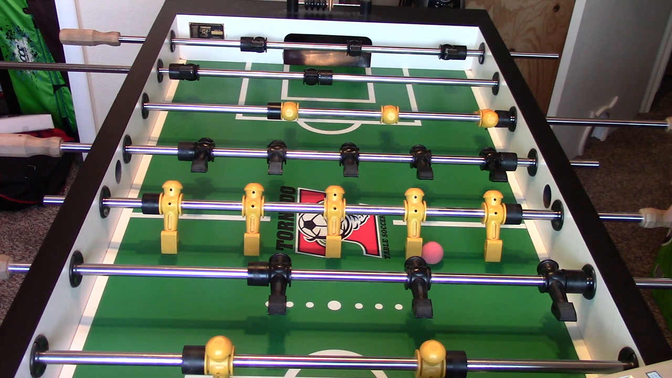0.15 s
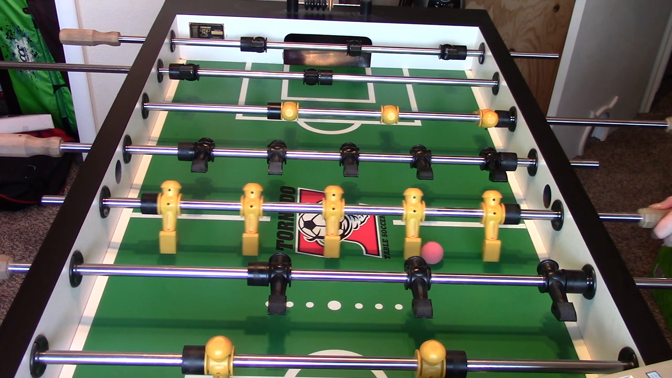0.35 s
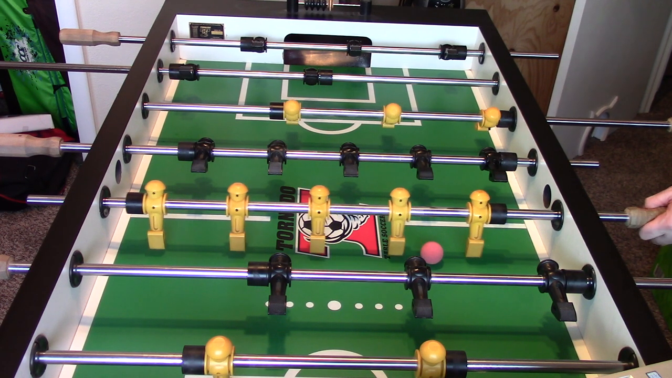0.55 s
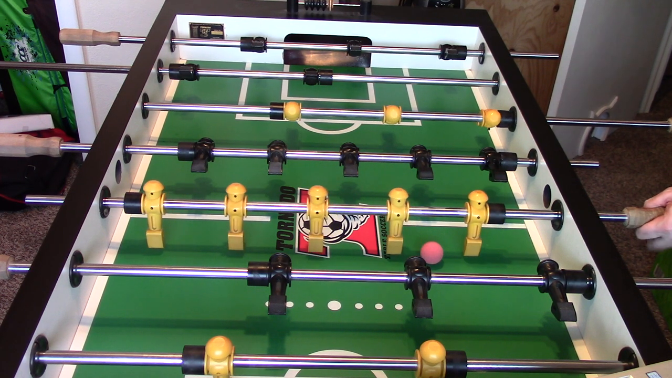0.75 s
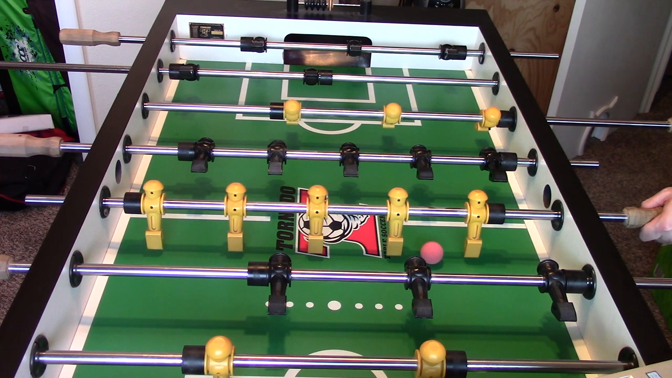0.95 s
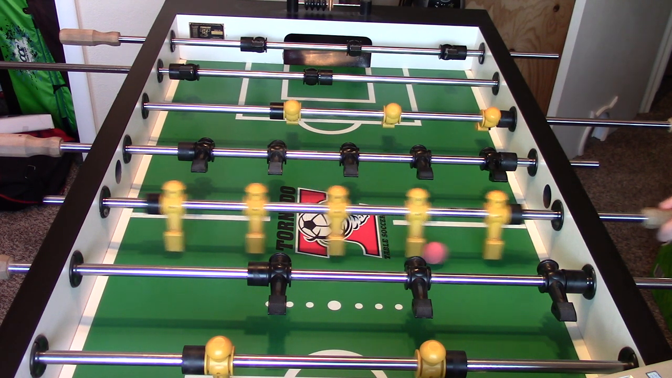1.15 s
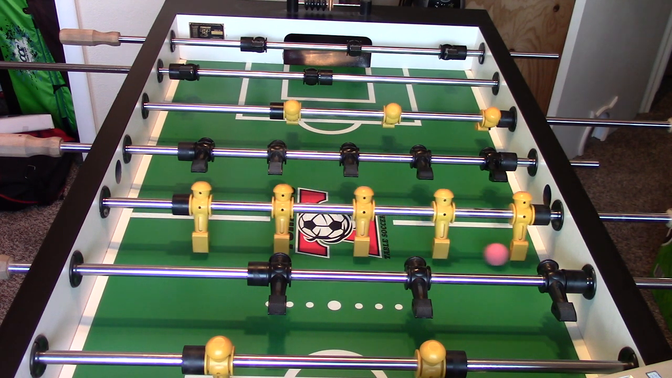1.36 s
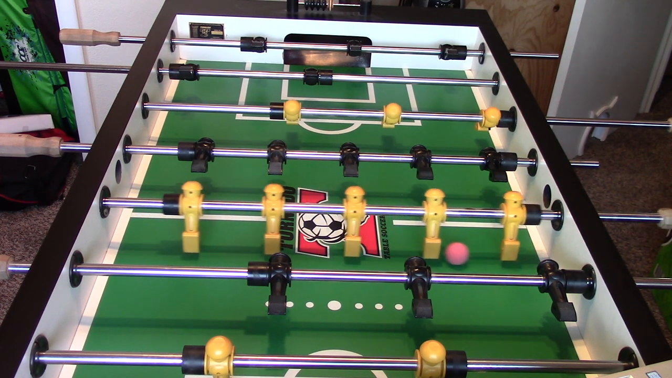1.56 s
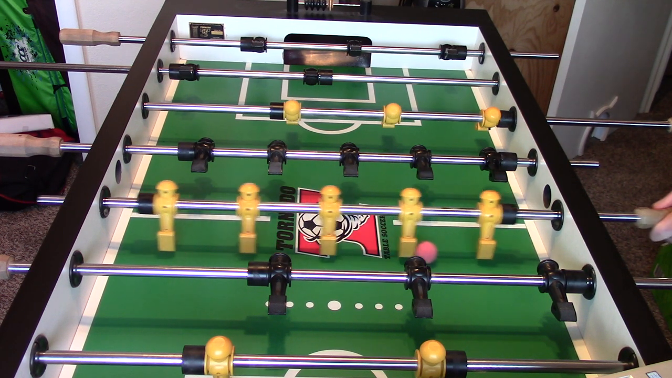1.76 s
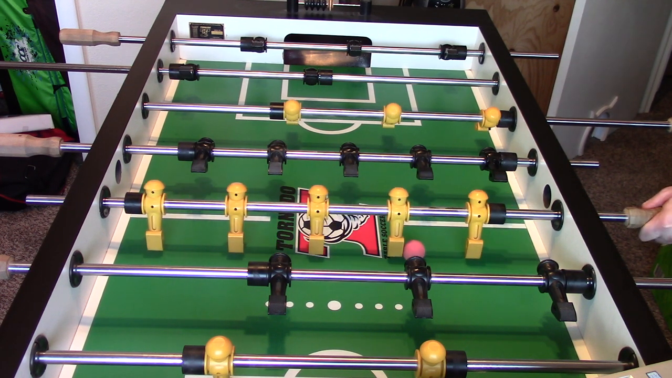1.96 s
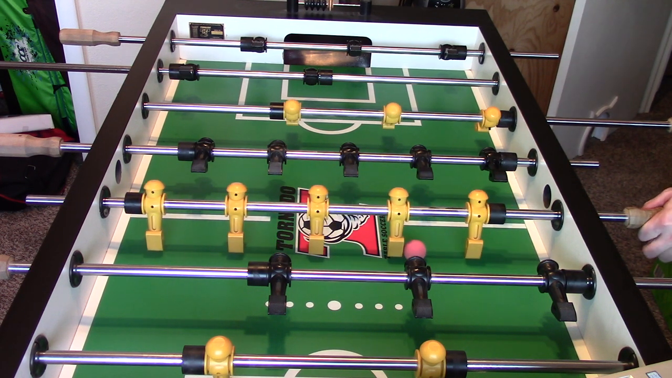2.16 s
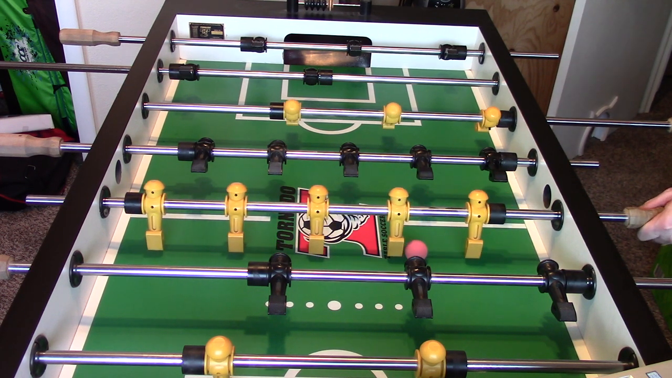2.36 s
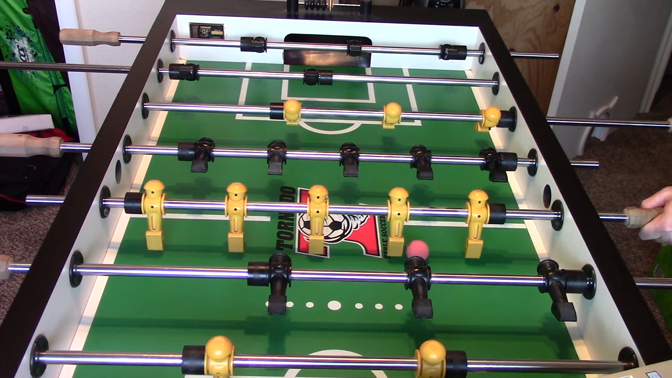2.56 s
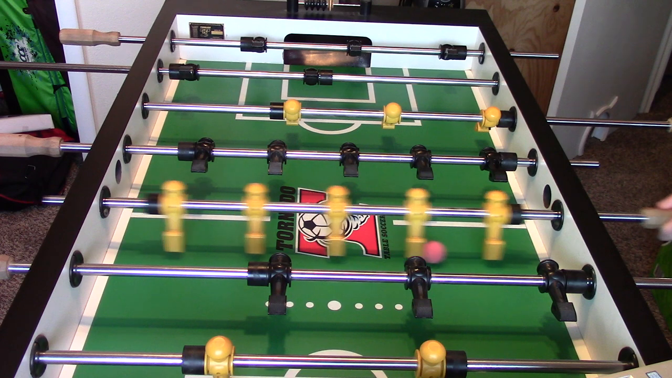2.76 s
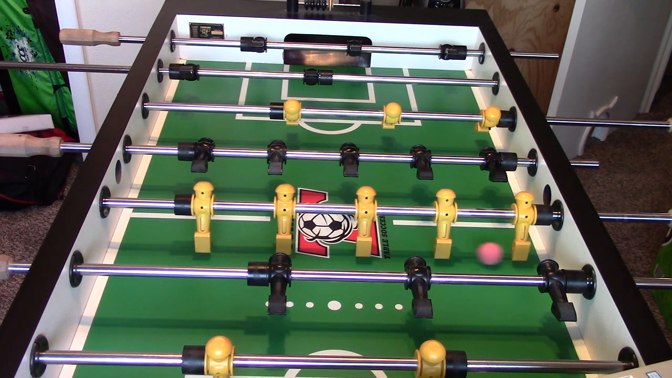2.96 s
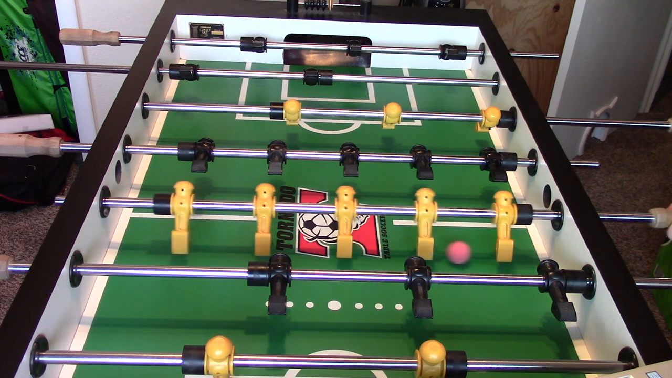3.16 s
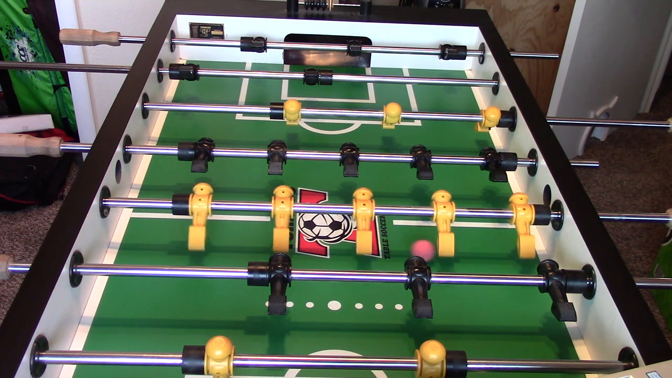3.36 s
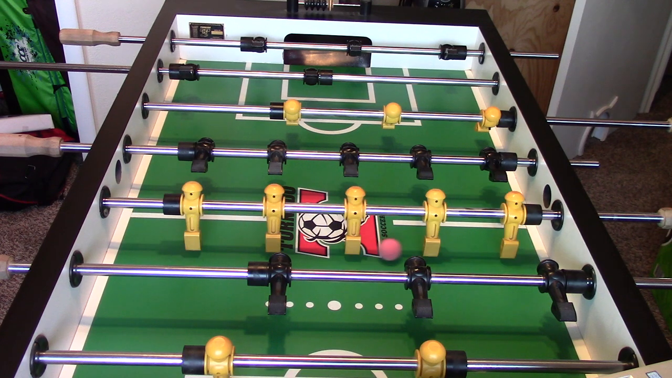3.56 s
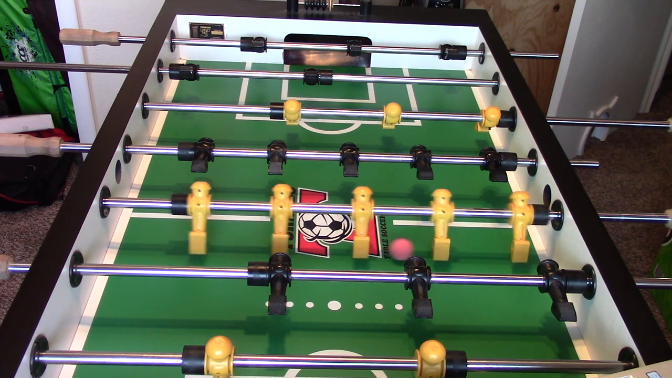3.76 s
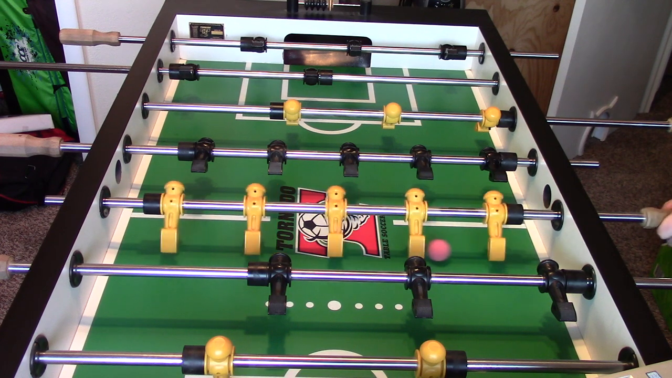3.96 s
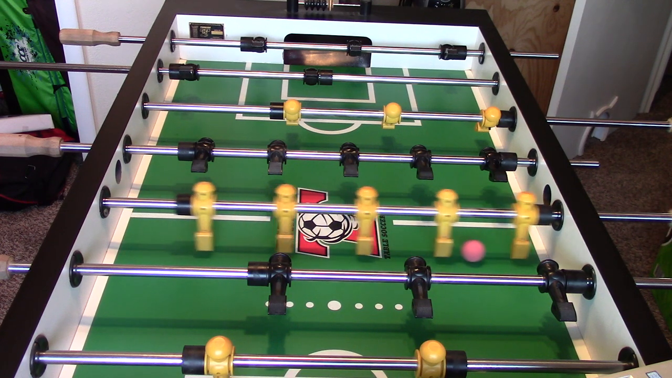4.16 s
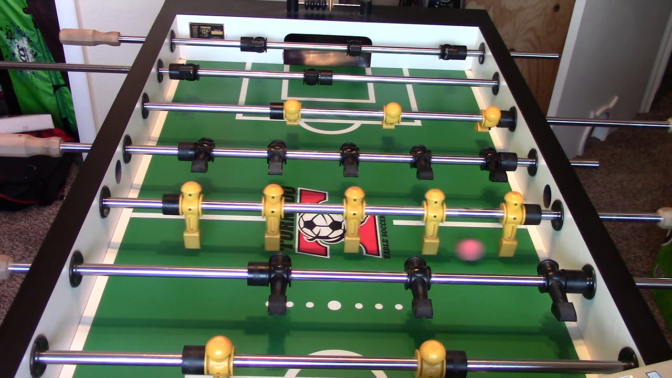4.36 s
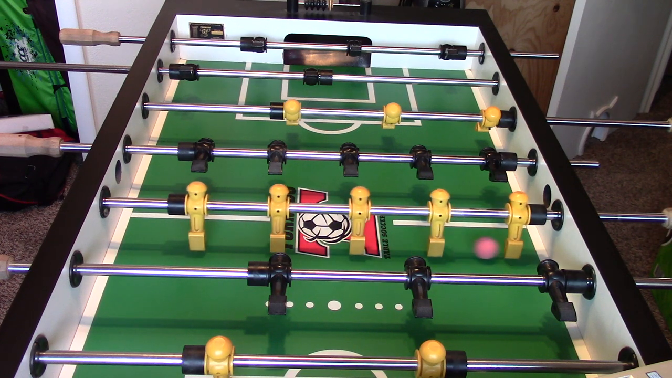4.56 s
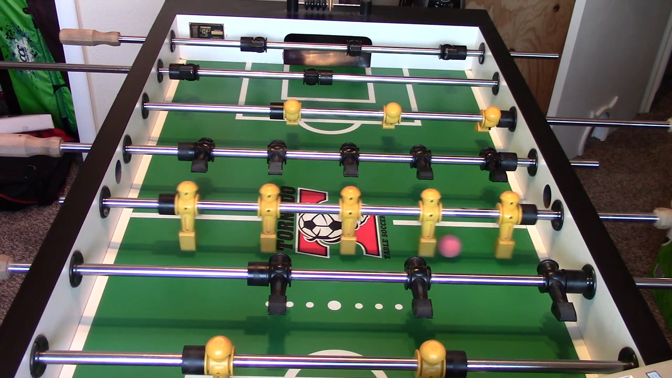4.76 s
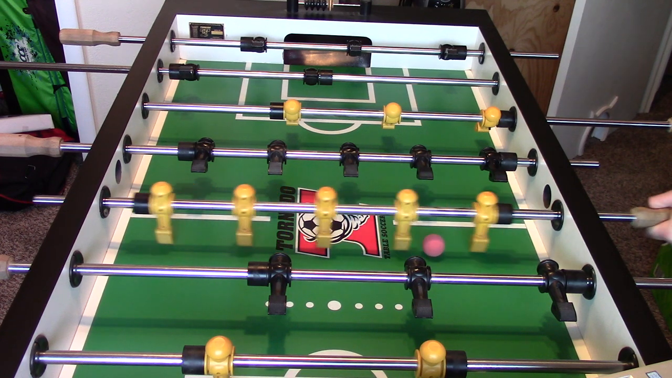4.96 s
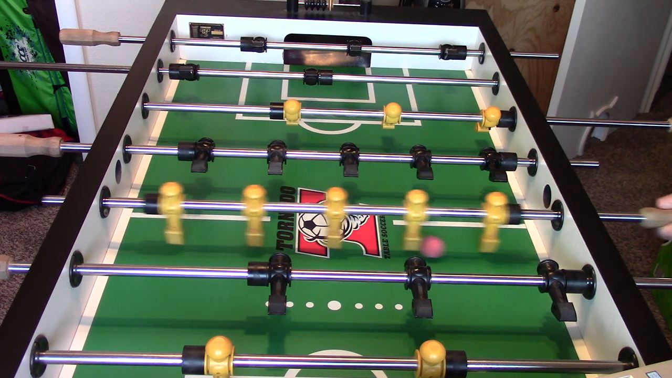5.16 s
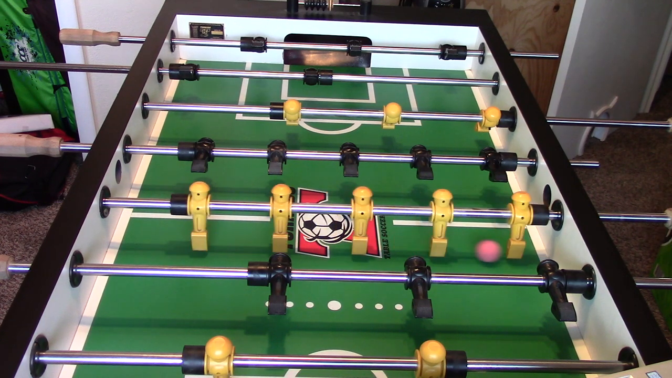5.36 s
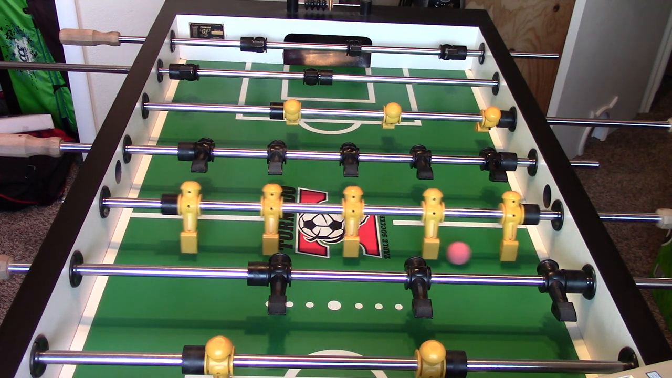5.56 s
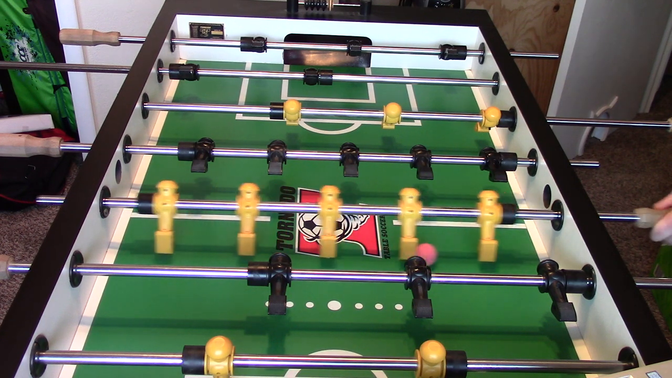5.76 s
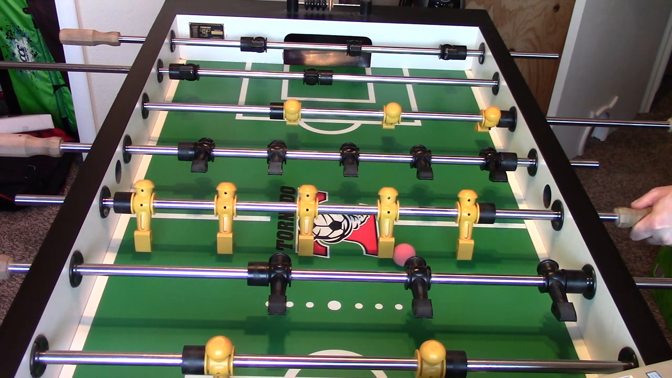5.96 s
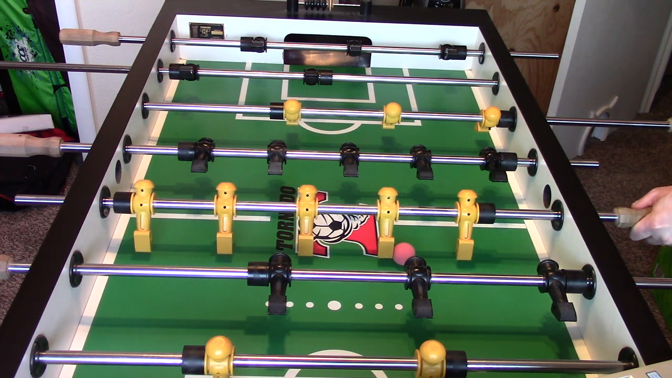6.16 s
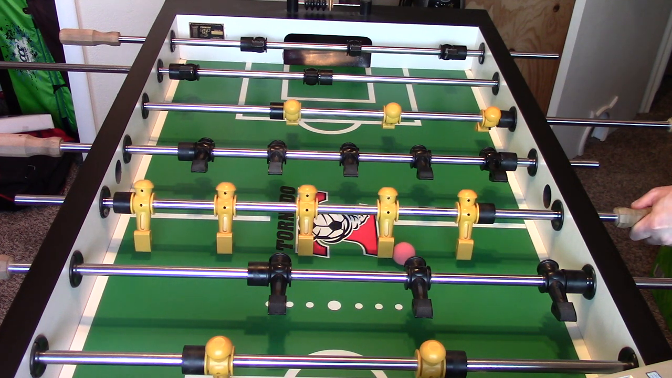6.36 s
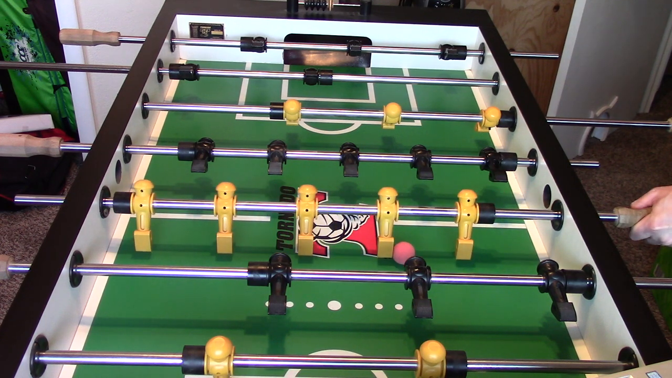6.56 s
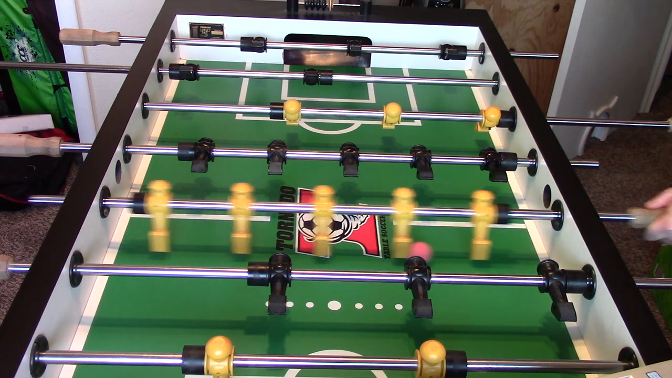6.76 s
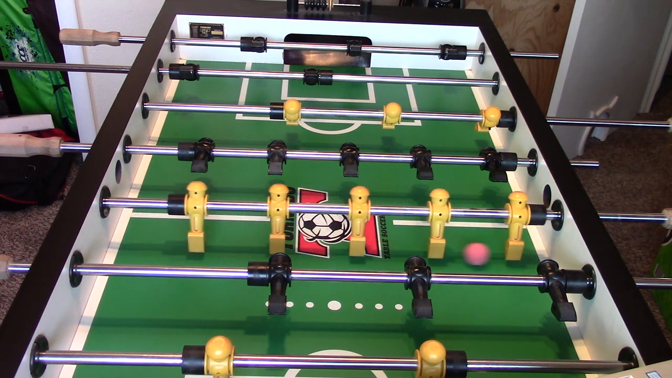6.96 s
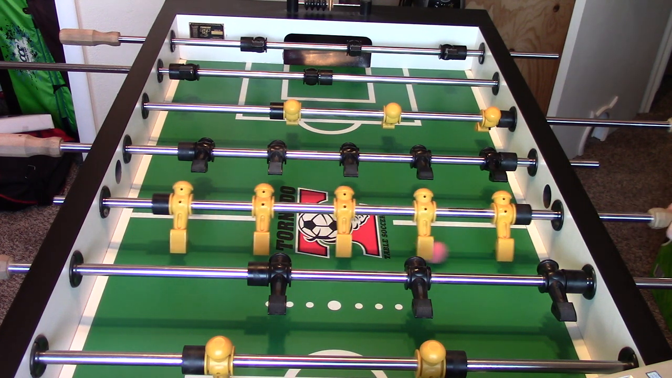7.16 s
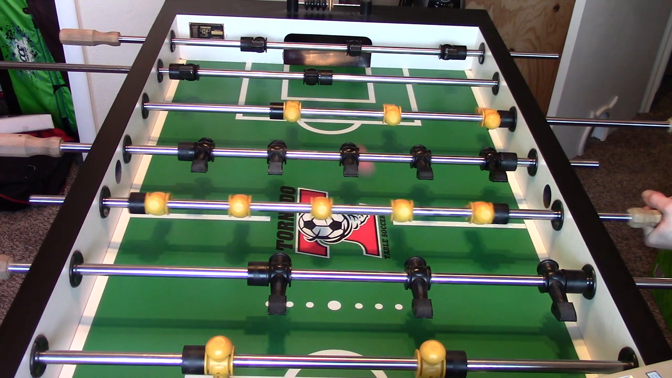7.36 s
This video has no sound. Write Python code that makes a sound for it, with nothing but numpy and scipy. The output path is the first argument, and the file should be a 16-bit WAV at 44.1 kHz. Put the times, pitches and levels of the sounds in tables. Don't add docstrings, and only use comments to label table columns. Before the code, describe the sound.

A hard ball clacks back and forth between plastic table figures, steel rod hissing and knocking a hollow wooden cabinet, then one loud shot.

```python
import sys
import numpy as np
from scipy import signal
from scipy.fft import rfft, irfft, next_fast_len
from scipy.io import wavfile
from scipy.ndimage import uniform_filter1d

SR = 44100
rng = np.random.default_rng(int(sys.argv[2]) if len(sys.argv) > 2 else 0)


def gain_from_decibels(decibels):
    exponent = np.asarray(decibels, float) / 20
    return 10 ** exponent


def dump_mix(stems):
    frames = np.atleast_2d(stems).T
    limited = np.clip(frames, -1, 1)
    pcm = np.round(limited * 32767).astype(np.int16)
    wavfile.write(sys.argv[1], SR, pcm)


N = 326207


def noise():
    return rng.standard_normal(N)


def band(x, hz, width, order=1):
    edges = np.clip([hz - width / 2, hz + width / 2], 20, 0.48 * SR)
    return signal.sosfilt(signal.butter(order, edges, "band", fs=SR, output="sos"), x)


def low_cut(x, hz, order):
    return signal.sosfilt(signal.butter(order, hz, "high", fs=SR, output="sos"), x)


def unit(x):
    return x / np.sqrt(np.mean(x ** 2))


def colour(x, table):
    hz, db = np.transpose(table)
    size = next_fast_len(len(x))
    log_hz = np.log(np.fft.rfftfreq(size, 1 / SR) + 1)
    gain = gain_from_decibels(np.interp(log_hz, np.log(hz), db))
    return irfft(rfft(x, size) * gain, size)[:len(x)]


def echo(x, t60, gap):
    t = np.arange(SR // 2) / SR
    tail = rng.standard_normal(len(t)) * gain_from_decibels(-60 * t / t60) * (t > gap)
    return signal.fftconvolve(x, tail / np.sqrt(np.sum(tail ** 2)))[:N]


def strike(times, gains, scales, hz, t60, detune, rise, rattle):
    out = np.zeros(N + SR)
    t = np.arange(SR // 4, dtype=np.float32) / SR
    push = 1 - np.exp(-t / max(rise, 1e-5))
    shifts = 1 + detune * rng.standard_normal(gains.shape)
    shake = unit(band(rng.standard_normal(3 * SR), 50, 60, order=2))
    flutter = 1 + rattle * shake.astype(np.float32)
    flutter = np.lib.stride_tricks.sliding_window_view(flutter, len(t))
    picks = rng.integers(0, len(flutter), gains.shape)
    for s, gain, scale, shift, pick in zip(times, gains, scales, shifts, picks):
        turn = np.float32(2 * np.pi * hz * shift)
        loss = np.float32(np.log(1000) / (t60 * max(scale, 0.2)))
        rings = np.sin(np.outer(turn, t)) * np.exp(-np.outer(loss, t)) * flutter[pick]
        start = int(s * SR)
        out[start:start + len(t)] += push * (np.float32(gain) @ rings)
    return out[:N]


# f/Hz, level/dB per Hz
ROOM_NOISE = [(25, -16), (70, -19), (110, -7), (160, -8.5), (260, -10), (400, -9.5), (700, -13.5),
              (1500, -18), (2500, -21), (6000, -27.5), (8000, -30), (11000, -35), (13500, -38),
              (16000, -47)]
# f/Hz, width/Hz, level/dB
HUM = [(124.4, 6.7, -62), (1333, 56, -71.5), (1581, 44, -72)]


def air(hum_db):
    hum = sum(gain_from_decibels(db) * unit(band(noise(), hz, width)) for hz, width, db in HUM)
    return unit(colour(noise(), ROOM_NOISE)) * gain_from_decibels(-59) + gain_from_decibels(hum_db) * hum


# t/s, length/s, hiss level/dB at top speed, squeal level/dB above the hiss
STROKES = [(0.17, 0.55, -68.5, 7.5), (0.687, 0.079, -67, 2), (0.85, 0.74, -77.5, 12), (1.145, 0.17, -64, 6),
           (1.49, 0.46, -70, 10), (1.997, .075, -67, -11), (2.635, 0.22, -75, 9), (2.722, .2, -63.5, 5.5),
           (3.03, 0.4, -67.5, 5), (3.397, 0.18, -71.5, 10.5), (3.588, .13, -71.5, 14.5),
           (3.736, .26, -67.5, 6), (3.973, 0.29, -69, 9.5), (4.23, 0.13, -69.5, 6),
           (4.657, 0.16, -69, 10.5), (4.8, 0.27, -68.5, 9), (5.06, 0.13, -70, 11.5),
           (5.164, 0.19, -67.5, 10), (5.496, 0.51, -68.5, 9.5), (6.135, 0.039, -72, -9),
           (6.658, 0.32, -65.5, 7), (6.965, 0.14, -72, 13), (7.24, .3, -56, 7), (7.391, 0.033, -46.5, -3)]


def strokes():
    speed_power = 0.57
    t = np.arange(N) / SR
    power = np.zeros((2, N))
    for start, length, hiss_db, squeal_db in STROKES:
        speed = np.sin(np.pi * np.clip((t - start) / length, 0, 1)).clip(0)
        top_gain = gain_from_decibels(np.array([hiss_db, hiss_db + squeal_db]) - 4)
        power += np.outer(top_gain, speed ** speed_power) ** 2
    return np.sqrt(power)


# f/Hz, width/Hz, level/dB
BEARING = [(1420, 2300, 9.5), (4200, 2400, -0.5), (7030, 3050, 2), (9150, 4800, -2), (13500, 3000, -13)]


def rod_friction():
    hiss_gain, squeal_gain = strokes()
    hiss = sum(gain_from_decibels(db) * unit(band(noise(), hz, width, order=2)) for hz, width, db in BEARING)
    squeal = unit(band(noise(), 2765, 690, order=2))
    return hiss * hiss_gain + squeal * squeal_gain


# t/s, peak level/dB
BUMPS = [(0.291, -36.5), (0.419, -50), (0.498, -38.5), (0.513, -45), (0.629, -44), (0.772, -32),
         (0.794, -37), (1.602, -39.5), (1.759, -41), (3.329, -42), (3.424, -44), (3.47, -40.5),
         (3.684, -21), (3.852, -28.5), (3.921, -42), (4.249, -38), (4.689, -35), (5.361, -31.5),
         (5.629, -53), (5.696, -38), (6.66, -42), (6.808, -28)]
# t/s, peak level/dB, centre f/Hz
RATTLES = [(0.347, -29.5, 417), (1.247, -27, 525), (1.322, -28, 530), (1.431, -24.5, 500),
           (2.734, -31.5, 467), (2.898, -27.5, 550), (2.96, -23.5, 410), (4.869, -39, 504),
           (5.184, -21, 510), (5.279, -24, 650), (6.842, -26.5, 374), (6.91, -29, 534), (6.949, -26, 554),
           (6.984, -32, 540), (7.338, -24, 528)]
# t/s, peak level/dB, centre f/Hz, hardness/dB per octave
THUDS = [(1.166, -19.5, 484, 3), (1.379, -15, 580, 2.5), (2.038, -41, 277, 16.5), (2.709, -18.5, 555, -1.5),
         (2.771, -24, 503, 1), (3.009, -15.5, 540, 4.5), (3.666, -16.5, 543, 5.5), (4.316, -16.5, 540, 5.5),
         (4.428, -11.5, 476, 6.5), (4.545, -16.5, 1130, -1), (4.849, -25, 483, 4.5), (5.164, -16, 473, 6),
         (5.404, -14.5, 1120, -5.5), (7.029, -11.5, 580, 4.5), (7.253, -1, 328, 3.5),
         (7.265, 1.5, 600, 5.5)]
# t/s, peak level/dB, centre f/Hz, bounce level/dB against the slap
SLAPS = [(1.178, -16.5, 484, -10), (1.402, -10.5, 525, -9.5), (2.786, -21.5, 428, -8),
         (3.025, -8.5, 663, -12), (4.327, -14, 420, -32), (4.338, -5.5, 577, -16), (4.459, -3, 620, -5),
         (4.563, -8, 545, -9.5), (5.428, -6, 626, -15.5), (7.041, -18, 680, -20.5),
         (7.054, -4.5, 629, -5.5), (7.271, -8.5, 533, 3.5), (7.281, -5, 1300, -1.5), (7.294, -6, 678, -10)]


def blows():
    bounce_s, bump_hz = 0.017, 280
    rows = [(s, db, hz, 0.9, 0.87, 0.1 + hard_db) for s, db, hz, hard_db in THUDS]
    rows += [(s, db, hz, 0.85, 0.58, 4.34) for s, db, hz, _ in SLAPS]
    rows += [(s + bounce_s, db + bounce_db, hz, 1, 0.81, 3.1) for s, db, hz, bounce_db in SLAPS]
    rows += [(s, db, hz, 0.65, 0.91, -2.5) for s, db, hz in RATTLES]
    rows += [(s, db, bump_hz, 1, 0.86, 1.7) for s, db in BUMPS]
    return np.transpose(rows)


# f/Hz, level/dB, t60/s
CABINET = [(143, -13.5, 0.51), (186, -2.5, 0.067), (238.3, -3.5, 0.56), (268.8, 4, 0.35), (302.5, 3, 0.13),
           (345.4, 2, 0.42), (380.6, -2.5, 0.55), (434.8, -4.5, 0.39), (484, 2, 0.14), (534, 1.5, 0.4),
           (573.2, 4.5, 0.14), (608.5, 2.5, 0.2), (638.6, 0.5, 0.053), (678, -2.5, 0.17), (728, -7, 0.33),
           (777, -8.5, 0.14), (844, -4, 0.32), (885.3, -3, 0.21), (902, -4.5, 0.23), (1037, 4, 0.089),
           (1098, -0.5, 0.14), (1196, -2, 0.28), (1241, -1, 0.091), (1343, 1, 0.15), (1475, -8, 0.32),
           (1494, -2, 0.088), (1646, -2.5, 0.12), (1770, 10, 0.05), (1799, -2, 0.063), (1867, -16.5, .14)]


def cabinet_knocks():
    hz, db, t60 = np.transpose(CABINET)
    s, peak_db, centre_hz, spread, scale, hard_db = blows()
    octaves = np.log2(hz / centre_hz[:, None]) / np.maximum(spread, 0.1)[:, None]
    spot = rng.standard_normal((len(s), len(hz)))
    tilt = gain_from_decibels(db + hard_db[:, None] * np.log2(hz / 500))
    shape = tilt * np.exp(-octaves ** 2 / 2) * (0.18 * spot + np.sign(spot))
    shape /= np.sqrt(np.sum(shape ** 2, axis=1, keepdims=True))
    gains = gain_from_decibels(peak_db - 4.5)[:, None] * shape
    return strike(s, gains, scale, hz, t60, detune=0.012, rise=0.002, rattle=0.7)


# t/s, level/dB, brightness (share of the upper panels, 0-1)
ROLL = [(0.4, -79, 0.5), (0.64, -49, 0.38), (1.19, -65.5, 0.3), (1.34, -36.5, 0.48), (1.54, -50.5, 0.1),
        (1.85, -47.5, 0.41), (2.1, -59.5, 0.2), (2.76, -67.5, 0.1), (2.88, -36, 0.51), (3.25, -44.5, 0.31),
        (3.46, -47.5, 0.01), (4.1, -47, 0.25), (5.18, -57.5, 0.46), (5.33, -38.5, 0.45), (5.75, -46, 0.07),
        (6.05, -61.5, 0.35), (6.55, -63.5, 0.1), (6.92, -37.5, 0.4)]


def rolling_ball():
    hz, db, _ = np.transpose(CABINET)
    low_modes = hz < 1300
    hz, db = hz[low_modes], db[low_modes]
    grain = noise() * gain_from_decibels(np.minimum(2.8 * rng.exponential(size=N), 18))
    panels = [gain_from_decibels(d) * unit(band(grain, f, 42.6, order=2)) for f, d in zip(hz, db)]
    low = unit(np.exp(-np.log2(hz / 280) ** 2 / 0.39) @ panels)
    high = unit(np.exp(-np.log2(hz / 560) ** 2 / 0.37) @ panels)
    s, roll_db, bright = np.transpose(ROLL)
    t = np.arange(N) / SR
    bright = np.clip(np.interp(t, s, bright), 0, 1)
    steps = np.repeat(rng.standard_normal(N // 900 + 1), 900)
    wobble = uniform_filter1d(steps, 900)[:N]
    gain = gain_from_decibels(np.interp(t, s, roll_db)) * gain_from_decibels(2.4 * wobble - 0.5)
    return ((1 - bright) * low + bright * high) * gain


# t/s, peak level/dB, f/Hz
TICKS = [
    (7.277, -37.5, 8600),
    (7.304, -41, 7720),
    (7.312, -40.5, 8000),
    (7.34, -39, 6500),
    (7.354, -45.5, 6100),
    (7.365, -42.5, 7000),
    (7.372, -48.5, 8500),
    (0.626, -49, 840),
    (0.775, -46.5, 1150),
]


def ticks():
    out = np.zeros(N)
    for s, db, hz in TICKS:
        gains = gain_from_decibels(db - np.array([[0.5, 3, 4]]))
        modes_hz = hz * np.array([1.01, 0.93, 1.09])
        t60 = np.full(3, 0.012) * (7000 / hz) ** 0.6
        out += strike([s], gains, [1], modes_hz, t60, detune=0.02, rise=0.0003, rattle=0.2)
    return out


# t/s, peak level/dB, lower ring level/dB, upper ring level/dB, top sizzle level/dB
CLACKS = [
    (1.1675, -24, -7.5, -15, -45),
    (1.3778, -22, -3.5, -10, -27),
    (3.6637, -24.5, -8, -12.5, -41),
    (4.315, -17, -14, -13, -34),
    (4.4276, -14, -13.5, -13.5, -22),
    (5.1628, -26.5, -1, -11, -26),
    (7.2635, -22.5, 8, -31, -34.5),
]
GLANCES = [
    (2.0417, -63.5, 5, -4.5, -4.5),
    (2.707, -36, 2, -23, -30),
    (2.771, -54, 3, -16.5, -13.5),
    (3.0081, -24, -4.5, -10, -35.5),
    (4.5442, -24.5, -5, -11.5, -27),
    (4.8475, -47.5, 6, -23.5, -21.5),
    (5.4039, -22, -11, -12.5, -28.5),
    (7.0274, -20.5, -7, -8, -26.5),
    (7.253, -23, 7.5, -5.5, -29),
]
# f/Hz, level/dB, t60/s
FIGURE = [(1868, 6, 0.17), (1884, -21, 0.078), (2200, -15, 0.12), (2565, -4, 0.25), (2664, 4, 0.11),
          (2720, 6, 0.061), (2970, -1, 0.082), (4674, 16.5, 0.054), (4550, 4, 0.061), (4750, -13, 0.06),
          (5220, 4.5, 0.1), (5600, -18, .06), (5650, -7, 0.041)]
# f/Hz, width/Hz, level/dB, t60/s
SCATTER = [(1370, 910, 3, 0.28), (2120, 240, 0.5, 0.25), (2390, 510, 1, 0.19), (3000, 740, -2, 0.21),
           (3090, 680, -2.5, 0.16), (3430, 1560, 13, 0.19), (4715, 650, 7.5, 0.2), (5480, 430, 0.5, 0.17),
           (7200, 2300, -10.5, 0.058), (8900, 2200, 5.5, 0.05), (13000, 3000, -1, 0.079)]


def clacks():
    s, peak_db, low_db, up_db, top_db = np.transpose(CLACKS + GLANCES)
    square = np.arange(len(s)) < len(CLACKS)
    gap_db = np.where(square, -7, 1.5)
    edge_db = np.where(square, 1.5, 1)
    edges_hz = [2200, 3250, 4300, 5000, 6100]
    part_db = peak_db + np.array([low_db, 0 * s, up_db + gap_db, up_db, up_db + edge_db, top_db])

    hz, db, t60 = np.transpose(FIGURE)
    spot = rng.standard_normal((len(s), len(hz)))
    level_db = part_db[np.digitize(hz, edges_hz)].T + db - 19
    gains = gain_from_decibels(level_db) * (spot * 0.46 + np.sign(spot))
    out = strike(s, gains, np.ones(len(s)), hz, t60, detune=0.01, rise=0.0001, rattle=0.52)

    t = np.arange(SR // 3) / SR
    crack = gain_from_decibels(7.5) * np.exp(-t / 0.00048)
    for f, width, d, decay in SCATTER:
        snap_db = 5.5 if f > edges_hz[-1] else 0
        shape = gain_from_decibels(-60 * t / decay) + crack * gain_from_decibels(snap_db)
        burst = np.zeros(N + SR)
        for start, gain in zip(s, gain_from_decibels(part_db[np.digitize(f, edges_hz)] + d - 14.5)):
            i = int(start * SR)
            burst[i:i + len(t)] += gain * shape
        out += band(burst[:N] * noise(), f, width, order=2) * np.sqrt(SR / 2 / width)
    return out


# t/s, peak level/dB, f/Hz, t60/s
TWANGS = [(1.178, -32, 500.3, 0.51), (1.194, -16.5, 487, 0.093), (1.774, -44.5, 495, 0.23),
          (1.858, -35, 473, 0.066), (1.878, -34.5, 491, 0.14), (2.735, -16, 489.4, 0.093),
          (2.789, -26, 470, 0.14), (4.872, -27.5, 487, 0.07), (5.184, -18, 493.5, 0.14),
          (5.846, -42.5, 451, 0.19), (7.2524, -4.5, 264.8, 0.1)]
# multiple of f, level/dB
ROD = [(1.003, 3), (1.25, -38), (1.739, -16), (2.45, -16), (3.84, -19)]


def rod_twangs():
    multiple, db = np.transpose(ROD)
    out = np.zeros(N)
    for s, peak_db, hz, t60 in TWANGS:
        gains = gain_from_decibels(peak_db + db - 1.5)[None]
        out += strike([s], gains, [1], hz * multiple, t60 / np.sqrt(multiple),
                      detune=0.0034, rise=0.0034, rattle=0.37)
    return out


# f/Hz, side level/dB against mid
AIR_SIDE = [(40, -35.5), (200, -6.5), (1000, -6), (4000, -9.5), (12000, -11.5)]
TABLE_SIDE = [(60, -14), (150, -95), (300, -38.5), (600, -31), (1200, -20), (2500, -19.5), (5000, -14),
              (9000, -24.5), (15000, -15)]


def scene():
    table = cabinet_knocks() + rolling_ball() + clacks() + rod_friction() + rod_twangs() + ticks()
    table = low_cut(table, 72.6, order=4)
    mid = table + gain_from_decibels(-11) * echo(table, t60=0.26, gap=0.0038)
    scattered = gain_from_decibels(-1) * colour(echo(mid, t60=0.069, gap=0.0004), TABLE_SIDE)
    side = scattered + colour(air(-14), AIR_SIDE)
    mid = mid + air(0)
    return np.array([mid + side, mid - side])


def band_limit(x):
    return signal.sosfilt(signal.butter(12, 15750, fs=SR, output="sos"), x)


def record(dry):
    rounded = np.tanh(0.92 * dry) / 0.96
    return band_limit(low_cut(rounded, 52, order=2))


dry = scene()
out = record(dry)
dump_mix(out)
```